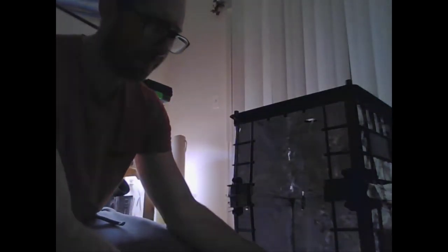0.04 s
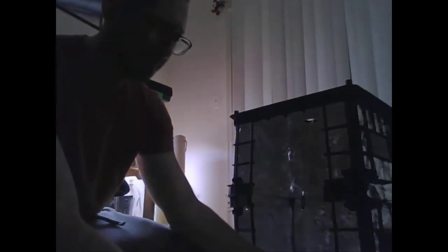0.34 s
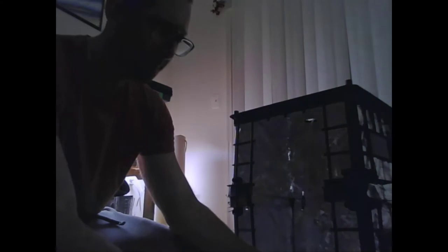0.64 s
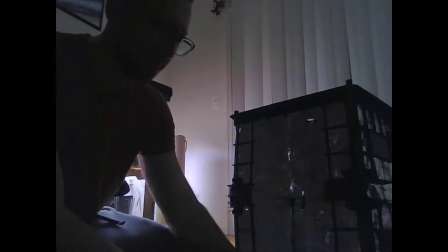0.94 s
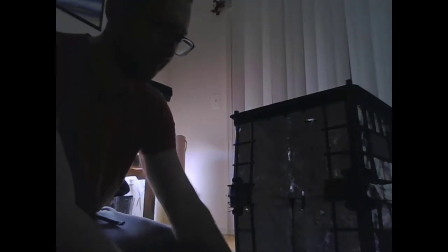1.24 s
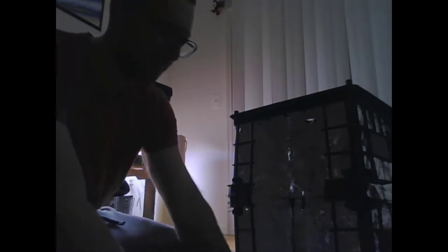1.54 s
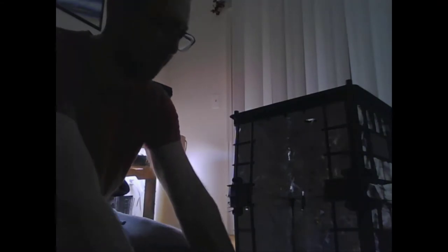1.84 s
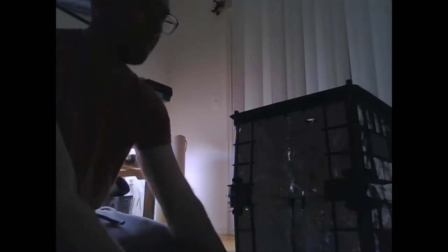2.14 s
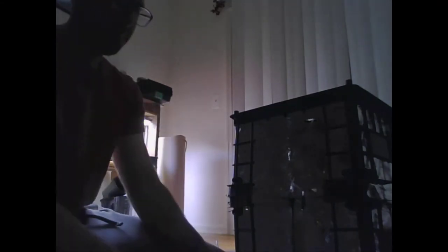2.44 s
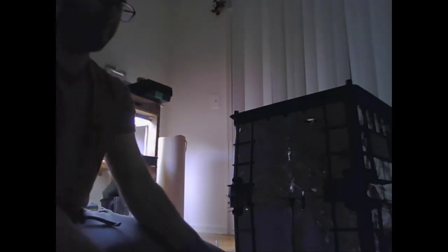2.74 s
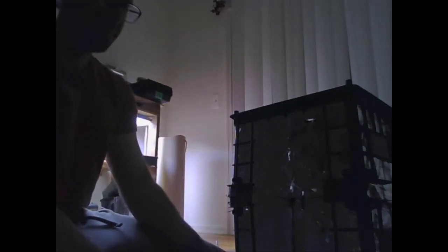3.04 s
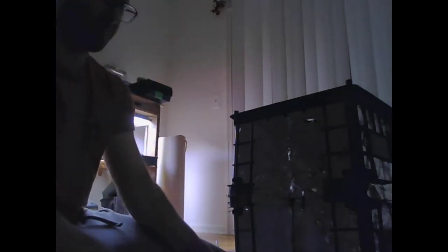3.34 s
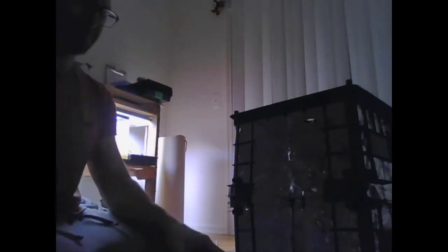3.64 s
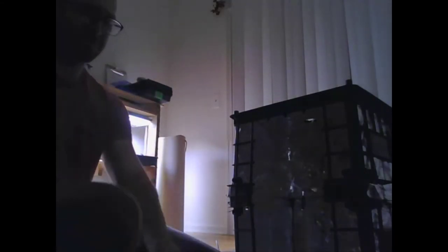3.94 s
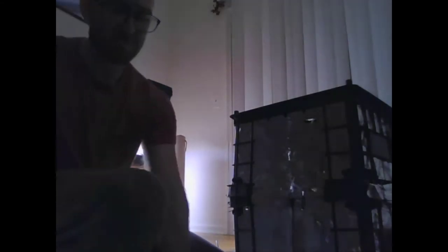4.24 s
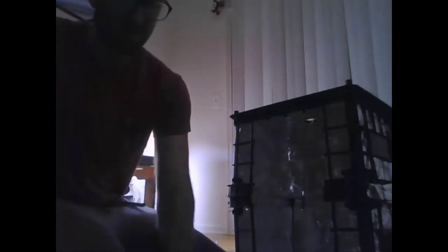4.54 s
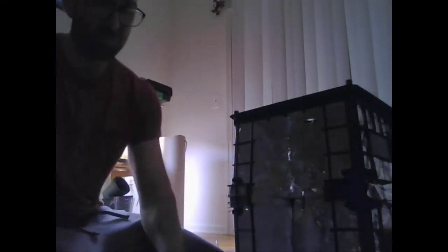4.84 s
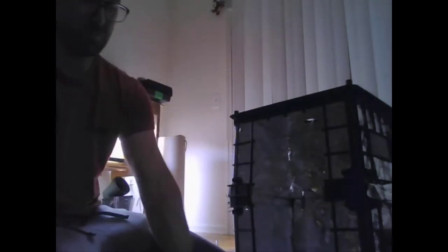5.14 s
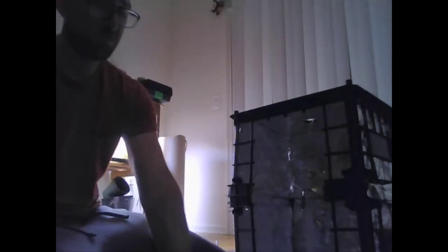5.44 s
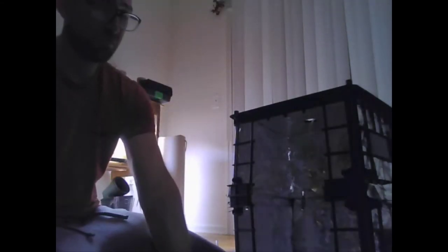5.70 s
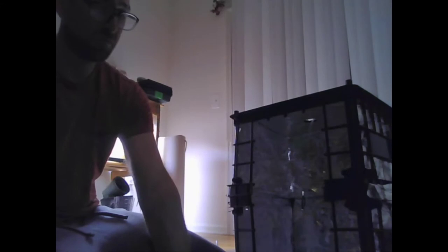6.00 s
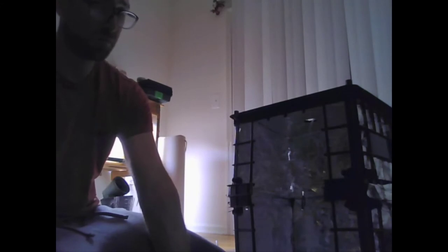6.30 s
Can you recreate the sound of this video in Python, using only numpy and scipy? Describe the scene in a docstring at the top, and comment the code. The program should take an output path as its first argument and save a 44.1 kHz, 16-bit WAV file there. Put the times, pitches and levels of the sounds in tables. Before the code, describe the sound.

Crisp crackles and snaps come in irregular clusters as a sheet of metal foil is pressed by hand, with quiet rustling in between. A brief lull holds a faint scrape and a dull bump on the floor, then sharper crinkling follows. A low, fan-like whirr runs quietly underneath in the small room, and the sound is thin, as through a small microphone.

```python
"""Aluminium foil is folded and pressed by someone kneeling on the floor of a small room.
Each push buckles the foil in a cascade of tiny snaps that ring its facets; stiff creases give way with
sharp ticks, and between pushes the sheet slides softly and once scrapes. A knee bumps the floor.
A small microphone with little bass and no top hears it over a steady low whirr."""
import sys
import numpy as np
from scipy import signal
from scipy.fft import rfft, irfft
from scipy.io import wavfile
from scipy.ndimage import uniform_filter1d

SR = 44100
rng = np.random.default_rng(int(sys.argv[2]) if len(sys.argv) > 2 else 0)


def log_audio(samples):
    """Write samples as a 16-bit WAV file to the path given in sys.argv[1]."""
    # one column per channel
    frames = np.atleast_2d(samples).T
    # limit to full scale, then quantise
    limited = np.clip(frames, -1, 1)
    pcm = np.round(limited * 32767).astype(np.int16)
    wavfile.write(sys.argv[1], SR, pcm)


N = 285210

# spectrum of the room's whirr: frequency_hz, level_db
WHIRR_SPECTRUM = [(50, -22), (100, -38.5), (155, -7.5), (210, -2.5), (265, 0), (345, -20.5), (430, -10.5),
                  (520, -6), (590, -19), (660, -6.5), (800, -20.5), (1100, -15.5), (2200, -24), (7400, -31)]
# the hands slide the sheet: start_s, length_s, level_db
SLIDES = [(0, 0.017, -56), (0.177, 0.74, -55), (1.347, 0.56, -50), (2.1, 0.34, -61), (2.445, 0.083, -59.5),
          (2.86, 0.12, -54), (3.203, 0.552, -67), (3.86, .09, -65.5), (4.008, 0.21, -70.5),
          (4.4, 0.25, -56), (4.65, 0.38, -64.5), (5.32, .5, -65), (6.03, 0.47, -63.5)]
# spectrum of the sliding sheet: frequency_hz, level_db
FRICTION_SPECTRUM = [(300, -25), (900, -12), (1700, -3), (2400, -7), (3200, -2.5), (5000, -2.5),
                     (7400, -5.5)]
# bands of the whole sheet, its facets and the snaps: low_hz, high_hz
FOIL_BANDS = [(170, 1200), (1200, 3000), (3000, 8200)]
# pushes that buckle the foil: crest_s, snap_level_db, hold_s, facet_re_snaps_db, sheet_re_snaps_db
BUCKLINGS = [(.161, -47, 0, -12, -20), (.262, -46, 0.0062, -11, -33), (.328, -37.5, 0.00031, -9.5, -35),
             (.353, -34, 0.0018, -14.5, -42), (.385, -49, 0.045, -9.5, -23), (.462, -30, .014, -6, -27),
             (.51, -39, 0.0057, -7, -24), (.541, -33, 0.0035, -11, -27), (.608, -45, 0, -13, -31),
             (.72, -49, 0.0084, -2.5, -24), (.809, -32, .018, -12, -28.5),
             (1.297, -35.5, 0.049, -6.5, -25.5), (1.311, -28.5, 0.018, -16.5, -33.5),
             (1.398, -35.5, 0.032, -8, -17), (1.466, -38, .05, -11, -15.5), (1.53, -37, 0.01, -12, -14.5),
             (1.572, -29.5, 0.013, -14, -31.5), (1.615, -40, 0.000077, -8, -12.5),
             (1.717, -37.5, 0.00057, -12, -16.5), (1.776, -25.5, 0.0064, -13, -24),
             (1.793, -22.5, 0.0062, -12, -29), (1.836, -26, 0.0076, -20.5, -30),
             (1.9, -31.5, 0.021, -14, -24), (1.968, -37.5, 0.00062, -2.5, -11),
             (1.982, -44.5, 0, -3.5, -8.5), (2.096, -39, .011, -5.5, -23.5),
             (2.153, -35.5, 0.037, -12, -25), (2.222, -38.5, .042, -10, -26), (2.325, -49, 0.0083, -9, -27),
             (2.678, -30.5, 0.06, -15, -38), (2.726, -23.5, 0.0095, -22.5, -37.5),
             (2.758, -29.5, 0.019, -15.5, -35), (2.785, -31, 0.016, -16, -29.5),
             (2.868, -34, 0.011, -8, -26.5), (2.96, -47, 0.078, -12.5, -25),
             (3.045, -39, 0.0086, -11.5, -34), (3.09, -48, 0.065, -5, -33), (3.138, -38.5, 0.014, -23, -37),
             (3.231, -52, 0.0048, -16, -44), (4.367, -22.5, 0.046, -17, -35),
             (4.387, -17.5, 0.028, -29.5, -31.5), (4.434, -32.5, 0.02, -9.5, -14.5),
             (4.565, -32, 0, -9, -17.5), (4.631, -54, 0, 2, -40), (4.749, -54.5, 0, -7, -17),
             (4.841, -36.5, 0.032, -9, -43), (4.859, -28, 0.0052, -12.5, -44),
             (5.298, -26, 0.039, -21, -29.5), (5.345, -28, 0.0069, -12, -20),
             (5.399, -40, 0.061, -8.5, -18.5), (5.506, -21.5, 0.0037, -14, -33),
             (5.555, -30.5, 0.0089, -15.5, -21), (5.618, -27.5, 0.0015, -13.5, -28.5),
             (5.66, -27, 0.011, -16.5, -41), (5.682, -28, 0.02, -8.5, -24), (5.714, -30.5, .007, -12, -25),
             (5.756, -45, .008, -5, -20), (5.847, -33.5, 0.014, -14, -29.5), (5.888, -46.5, 0, -2, -12),
             (6.024, -31, 0.0011, -16.5, -47.5), (6.053, -47.5, 0.0026, -2.5, -18),
             (6.106, -34, 0, -21, -29.5), (6.14, -30, 0, -11.5, -36), (6.177, -23.5, .002, -17.5, -44),
             (6.208, -31.5, .008, -15, -31), (6.224, -24, 0.0014, -13.5, -34), (6.249, -30.5, 0, -10, -43),
             (6.31, -52.5, 0, -10, -36), (6.392, -29.5, 0.015, -15, -48), (6.438, -37, 0.041, -12, -26)]
# spectrum of the crinkling foil: frequency_hz, level_db
FOIL_SPECTRUM = [(150, -28), (350, -28), (460, -23.5), (780, -22.5), (1000, -15), (1270, -16.5),
                 (1650, -10), (2100, -9), (2400, -12), (3100, -5), (3600, 2), (5000, 1), (6500, 1.5),
                 (7400, -2.5)]
# single stiff creases giving way: start_s, level_db
STIFF_CREASES = [(0.8046, -18), (1.2763, -29), (1.297, -23), (1.4002, -19), (1.5743, -21.5), (1.777, -17),
                 (1.795, -12), (1.8365, -11.5), (1.9666, -28), (2.0951, -23), (2.6818, -17), (2.8697, -22),
                 (4.367, -10.5), (4.566, -13.5), (4.8414, -18.5), (5.2956, -16.5), (5.323, -14.5),
                 (5.5076, -8), (5.659, -9), (5.696, -13), (5.8466, -20), (6.0217, -15.5), (6.109, -22),
                 (6.1739, -13), (6.2487, -11), (6.3892, -18.5)]
# one soft scrape of the sheet: centre_s, spread_s, level_db, resonance_hz, bandwidth_hz
SOFT_SCRAPE = (3.912, .026, -61.5, 1520, 400)
# the knee's bump and two fainter ones just after it: start_s, level_db
KNEE_BUMPS = [(4.124, -37), (4.155, -48.5), (4.204, -49)]
# modes of the floor: pitch_hz, level_db, t60_s
FLOOR_MODES = [(171.4, 13, 0.065), (145, -2, 0.11), (203, -2, 0.062)]

FOIL_TOP_HZ = FOIL_BANDS[-1][1]
MIDDLING_DB = -35  # the settings below hold for a push of this level
SNAPS_PER_S, SNAPS_DOUBLE_DB = 2900, 15  # rate at the crest; a push this much harder doubles it
RISE_S, FALL_S = 0.0078, 0.02  # time constants of the cascade
RISE_HALVES_DB, FALL_HALVES_DB = 30.5, 22.5  # a push this much harder halves them
# harder pushes snap smaller creases: base treble tilt, added tilt, extra force that doubles the latter
TILT_DB, BRIGHTEN_DB, BRIGHTEN_DOUBLES_DB = -0.5, 1.5, 6
# a hold about this short is a flick: its rise and fall lose up to this share, and it sounds brighter
FLICK_S, FLICK_SHARE, FLICK_TILT_DB = 0.0023, 0.32, 4.5


def undb(db):
    """Amplitude grows tenfold for every 20 dB."""
    return 10 ** (np.asarray(db) / 20)


def unit(x):
    """Normalisation to an rms of 1."""
    return x / np.sqrt(np.mean(x ** 2) + 1e-30)


def colour(x, spectrum):
    """Spectral shaping by (frequency_hz, level_db) points joined along log frequency."""
    hz, db = np.transpose(spectrum)
    bin_hz = np.maximum(np.arange(len(x) // 2 + 1) * SR / len(x), 1)
    gain = undb(np.interp(np.log(bin_hz), np.log(hz), db))
    return irfft(rfft(x) * gain, len(x))


def band(x, edges_hz):
    """Zero-phase band-pass filtering, so that neighbouring bands add up flat."""
    return signal.sosfiltfilt(signal.butter(4, edges_hz, "bandpass", fs=SR, output="sos"), x)


def wander(rate_hz, size):
    """Random modulation: straight ramps between Gaussian values, with a spread near 1."""
    step = max(int(SR / rate_hz), 1)
    held = np.repeat(rng.standard_normal(size // step + 1), step)
    return uniform_filter1d(held, step)[:size]


def gesture(t, rise_s, hold_s, fall_s):
    """Exponential growth up to t = 0, a plateau, then exponential decay."""
    return np.exp(-np.maximum(-t, 0) / rise_s - np.maximum(t - hold_s, 0) / fall_s)


def snaps(size, per_s, spread_db):
    """A Poisson process: creases pop in or out at random moments, with unequal strength."""
    fires = rng.random(size) < per_s / SR
    strength = undb(spread_db * np.minimum(rng.exponential(size=size), 4))
    return fires * strength * np.sign(rng.standard_normal(size))


def ringing(t60_s, wet_db):
    """Impulse response of dense damped modes: a direct click, then decaying noise."""
    t = np.arange(int(t60_s * SR) + 2) / SR
    ring = rng.standard_normal(len(t)) * undb(-60 * t / t60_s)
    ring *= undb(wet_db) / np.linalg.norm(ring)
    ring[0] += 1
    return ring


def whirr(level_db=-64.5):
    """Broadband noise with low spectral peaks: a steady rush, as of a fan, with faint hiss above."""
    rush = unit(colour(rng.standard_normal(N), WHIRR_SPECTRUM))
    return rush * undb(level_db + 0.45 * wander(5.5, N))


def sliding(rise_s=0.046, fall_s=0.055):
    """Friction of foil on foil: tiny slips merge into a grain whose level follows the uneven pressure."""
    t = np.arange(N) / SR
    strokes = [undb(db) * gesture(t - start_s, rise_s, length_s, fall_s)
               for start_s, length_s, db in SLIDES]
    slips = colour(snaps(N, per_s=5000, spread_db=1.0), FRICTION_SPECTRUM)
    grain = band(slips, (FOIL_BANDS[0][0], FOIL_TOP_HZ))
    pressure_db = 1.6 * wander(35, N)
    return unit(grain) * np.max(strokes, axis=0) * undb(pressure_db)


def facet_resonance(x, tilt_db, ripple_db=1.5, count=22):
    """Resonance depends on shape: each new shape of the foil adds new broad peaks to its spectrum."""
    hz = np.geomspace(FOIL_BANDS[0][1], FOIL_TOP_HZ, count)
    brightness_db = tilt_db * np.interp(hz, [3800, 6800], [-.5, .5])
    facets = np.column_stack([hz, brightness_db + ripple_db * rng.standard_normal(count)])
    return colour(colour(x, FOIL_SPECTRUM), facets)


def buckling(snap_db, hold_s, facet_db, sheet_db, size, lead):
    """Elastic instability: a push sets off a cascade of snaps, denser and brighter with more force."""
    force_db = snap_db - MIDDLING_DB
    flick = np.exp(-hold_s / FLICK_S)
    rise_s = RISE_S * 2 ** (-force_db / RISE_HALVES_DB) * (1 - FLICK_SHARE * flick)
    fall_s = FALL_S * 2 ** (-force_db / FALL_HALVES_DB) * (1 - FLICK_SHARE * flick)
    push = gesture((np.arange(size) - lead) / SR, rise_s, hold_s, fall_s)
    per_s = SNAPS_PER_S * 2 ** (force_db / SNAPS_DOUBLE_DB)
    clicks = snaps(size, per_s, spread_db=2.0) * push * undb(0.88 * wander(260.3, size))
    rung = signal.fftconvolve(clicks, ringing(t60_s=0.032, wet_db=-1))[:size]
    tilt_db = TILT_DB + BRIGHTEN_DB * 2 ** (force_db / BRIGHTEN_DOUBLES_DB) + FLICK_TILT_DB * flick
    crackle = facet_resonance(rung, tilt_db)
    gains = undb(snap_db + np.array([sheet_db, facet_db, 0])) * np.sqrt(np.mean(push ** 2))
    return sum(gain * unit(band(crackle, edges)) for gain, edges in zip(gains, FOIL_BANDS))


def stray_bucklings(firm_db=-60.5, per_s=8, above_slide_db=2, scatter_db=2):
    """A buckling threshold: only firm slides set off faint cascades, given as rows like BUCKLINGS."""
    hold_s, facet_db, sheet_db = 0.003, -3, -16
    rows = []
    for start_s, length_s, slide_db in SLIDES:
        if slide_db > firm_db:
            for _ in range(int(length_s * per_s)):
                crest_s = start_s + length_s * rng.random()
                snap_db = slide_db + above_slide_db + scatter_db * rng.standard_normal()
                rows.append((crest_s, snap_db, hold_s, facet_db, sheet_db))
    return rows


def crinkling():
    """Superposition: the cascades add, each cresting at its own moment."""
    size, lead = 20000, 5000  # samples in a cascade, and ahead of its crest
    out = np.zeros(N + 2 * size)
    for crest_s, *push in list(BUCKLINGS) + stray_bucklings():
        start = int(crest_s * SR)
        out[start:start + size] += buckling(*push, size, lead)
    return out[lead:lead + N]


def ticking(gain_db=-3.5, low_hz=2300):
    """Snap-through: each stiff crease flips at once and rings briefly in the treble."""
    size, lead = 4096, 256
    out = np.zeros(N + 2 * size)
    for start_s, level_db in STIFF_CREASES:
        ring = np.pad(ringing(t60_s=0.034, wet_db=7.0), (lead, size))[:size]
        tick = band(facet_resonance(ring, tilt_db=9.0), (low_hz, FOIL_TOP_HZ))
        start = int(start_s * SR)
        out[start:start + size] += undb(level_db + gain_db) * tick / np.abs(tick).max()
    return out[lead:lead + N]


def scraping():
    """Frictional excitation: a brief drag of the sheet drives one broad resonance."""
    centre_s, spread_s, level_db, resonance_hz, bandwidth_hz = SOFT_SCRAPE
    resonator = signal.iirpeak(resonance_hz, resonance_hz / bandwidth_hz, fs=SR)
    grain = signal.lfilter(*resonator, snaps(N, per_s=3000, spread_db=0))
    drag = np.exp(-.5 * ((np.arange(N) / SR - centre_s) / spread_s) ** 2)
    return unit(grain) * undb(level_db) * drag


def knee(contact_s=0.011):
    """Damped free vibration: a soft weight lands on the floor and sets its low modes going."""
    out = np.zeros(N)
    for start_s, level_db in KNEE_BUMPS:
        t = np.maximum(np.arange(N) / SR - start_s, 0)
        ring = sum(undb(mode_db - 60 * t / t60_s) * np.sin(2 * np.pi * pitch_hz * t)
                   for pitch_hz, mode_db, t60_s in FLOOR_MODES)
        soft_onset = 1 - np.exp(-(t / contact_s) ** 2)
        out += undb(level_db) * ring * soft_onset
    return out


def scene():
    """Reverberation: the foil gains near reflections and a short room tail; knee and whirr add dry."""
    foil = crinkling() + ticking() + sliding() + scraping()
    near = signal.fftconvolve(foil, ringing(t60_s=0.038, wet_db=-9))[:N]
    room = signal.fftconvolve(near, ringing(t60_s=0.31, wet_db=-22))[:N]
    return (room + knee() + whirr())[None]


def record(dry, bass_hz=120, top_hz=7530):
    """Band limiting: the microphone passes little bass, and its channel ends abruptly in the treble."""
    thin = signal.sosfilt(signal.butter(3, bass_hz, "highpass", fs=SR, output="sos"), dry)
    return signal.sosfilt(signal.ellip(12, .1, 70, top_hz, fs=SR, output="sos"), thin)


dry = scene()
out = record(dry)
log_audio(out)
```